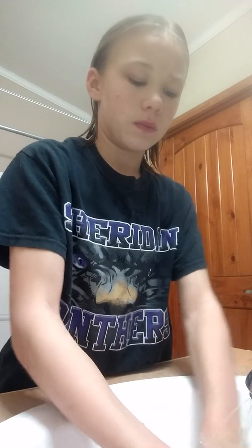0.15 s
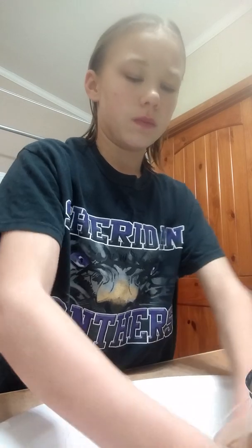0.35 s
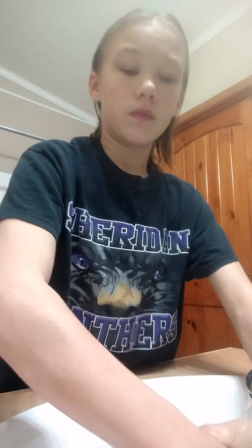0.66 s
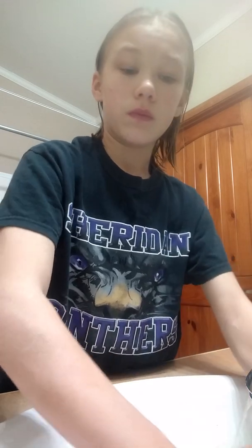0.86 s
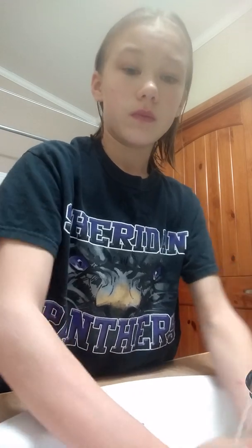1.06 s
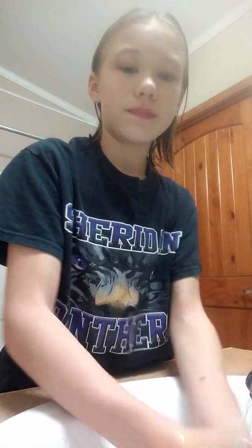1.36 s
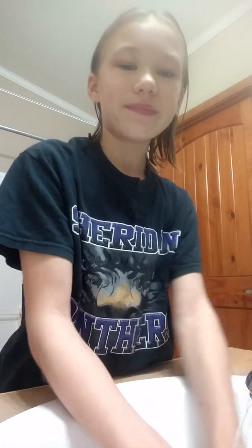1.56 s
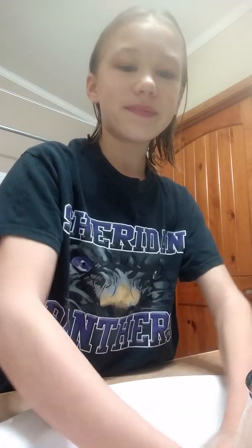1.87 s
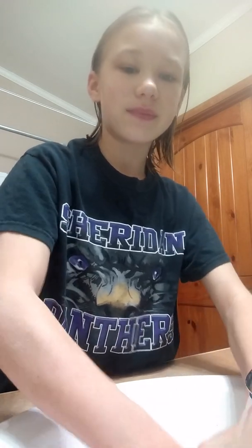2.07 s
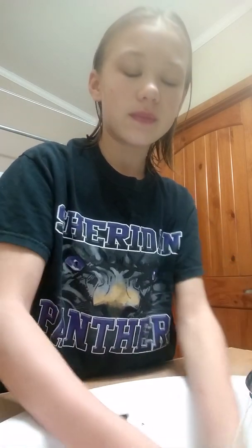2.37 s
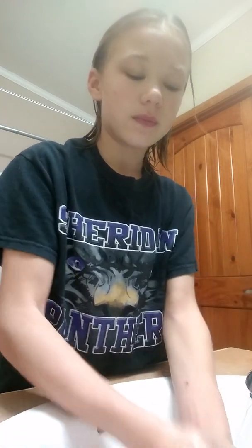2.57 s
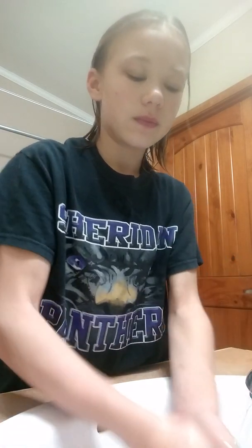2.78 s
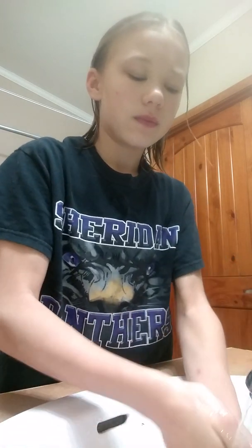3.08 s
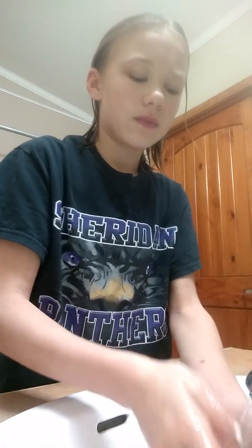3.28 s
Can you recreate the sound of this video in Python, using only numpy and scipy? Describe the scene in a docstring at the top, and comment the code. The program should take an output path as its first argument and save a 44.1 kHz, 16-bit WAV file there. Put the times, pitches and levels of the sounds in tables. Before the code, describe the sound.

Tap water rushes continuously into a ceramic basin in a small bathroom, broken by hands into spatters and occasional gurgles, with faint resonant ringing and low hum, heard close on a phone in stereo.

```python
"""In a small bathroom, a tap runs into a ceramic basin while hands are rinsed in the stream, close to a phone.
The churning water is noise that swells in drifting patches, with a fizz of tiny rising tones for bubbles.
Larger bubbles gurgle as gliding tones with a noisy wake; spits are short noisy bursts with a tick, high and low.
Basin, tap and room ring along as narrow resonances over a faint low hum.
The phone's two microphones hear the water with different colour and phase."""
import sys
import numpy as np
from scipy import signal
from scipy.fft import rfft, irfft, next_fast_len
from scipy.io import wavfile
from scipy.ndimage import uniform_filter1d

SR = 44100
rng = np.random.default_rng(int(sys.argv[2]) if len(sys.argv) > 2 else 0)


def log_audio(samples):
    """Write samples as a 16-bit WAV file to the path given in sys.argv[1]."""
    # one column per channel
    frames = np.atleast_2d(samples).T
    # limit to full scale, then quantise
    limited = np.clip(frames, -1, 1)
    pcm = np.round(limited * 32767).astype(np.int16)
    wavfile.write(sys.argv[1], SR, pcm)


N = 152145

# balance of the hiss between the microphones: pitch_hz [Hz], left_minus_right_db [dB]
BALANCE = [(30, 1.2), (50, 4.5), (70, 4.6), (100, 2.8), (150, 1.7), (300, -2.3), (450, -2.4), (650, -4.5),
           (900, -5.0), (1060, -2.9), (1250, -0.7), (1550, -2.5), (1800, -2.2), (2200, -1.7), (2500, -0.2),
           (2720, -2.0), (3100, -2.4), (3500, -0.5), (3900, -2.2), (4250, 2.0), (4500, -4.7), (4750, 0.0),
           (5050, -1.3), (5350, -6.7), (5650, -5.2), (6000, -1.8), (6500, 0.0), (6850, 0.7), (7500, 0.4),
           (8000, 1.0), (8350, 6.0), (8650, 9.0), (9300, 4.4), (9700, 0.6), (10600, 0.4), (11150, 1.7),
           (11600, 0.5), (11900, 0.0), (12350, 0.3), (12650, 1.5), (12950, -0.0), (13450, -1.4),
           (13900, 3.7), (14200, 0.2), (14450, -0.3), (14600, -1.5), (14800, -0.0), (15050, 2.1),
           (15300, 0.9), (15500, 1.1)]
# colour of the hiss at the BALANCE frequencies, ahead of swell and balance: level_db [dB per Hz]
HISS_COLOUR = [-93, -86, -66, -69, -62.5, -65, -65.5, -66, -62.5, -69, -64, -64, -71.5, -74.5, -76, -70.5,
               -76, -76, -74, -70, -75, -70.5, -69.5, -71.5, -71, -79, -75.5, -79, -75, -76, -74.5, -69,
               -76.5, -76, -79.5, -75, -84, -85, -77, -82, -87, -83, -80.5, -70, -77, -78, -91, -75, -85,
               -90]


def amp(db):
    """Turns decibels into a plain multiplier."""
    return 10 ** (np.asarray(db) / 20)


def evened(x):
    """Scales a signal to an average (RMS) strength of 1."""
    return x / np.sqrt(np.mean(x ** 2) + 1e-20)


def along(hz, values, table=BALANCE):
    """Reads values, listed at the table's frequencies, at the frequencies hz on a log scale."""
    table_hz = np.transpose(table)[0]
    return np.interp(np.log(hz + 1), np.log(table_hz + 1), values)


def flow_db(t):
    """Swell of the water's body and treble around their means, in dB at the times t."""
    # loudness of the flow: start_s [s], body_db [dB, below about 2 kHz], treble_db [dB]
    flow_points = [(0.0, -39.5, -40.5), (0.07, -40.5, -39.5), (0.1, -37.5, -39), (0.76, -38.5, -41),
                   (0.93, -36.5, -39), (1.37, -37.5, -39.5), (1.4, -36, -35.5), (1.52, -35, -39.5),
                   (1.66, -37, -38), (1.77, -34, -39), (1.8, -38.5, -38.5), (1.9, -36, -37),
                   (2.11, -39, -41), (2.14, -35.5, -36), (2.4, -37, -40), (2.77, -36.5, -36.5),
                   (2.84, -38.5, -39), (3.03, -34, -37), (3.13, -39.5, -36.5), (3.19, -37, -37.5),
                   (3.42, -40.5, -39), (3.45, -39.5, -32)]
    start_s, *levels = np.transpose(flow_points)
    return [np.interp(t, start_s, db) - np.mean(db) for db in levels]


def bubble(hz, cycles, rise):
    """A trapped air bubble sings a short dying tone that glides upward."""
    u = np.arange(0, 3, hz / cycles / SR)  # time, where 1 lasts the given number of starting cycles
    fade = np.minimum(u / 0.09, 1) * np.exp(-2.5 * u)
    return fade * np.sin(2 * np.pi * cycles * (u + rise * u ** 2 / 2))


def burst(hz, octaves, envelope):
    """Splashing water as noise around hz under an envelope, filtered from white noise of strength 1."""
    f = np.fft.rfftfreq(len(envelope), 1 / SR) + 1
    band = np.exp(-(np.log2(f / hz) / octaves) ** 2 / 2)
    noise = rfft(rng.standard_normal(len(envelope)))
    return envelope * irfft(noise * band, len(envelope))


def churn():
    """Turbulent water as three unrelated noise streams that share the flow, patches and flicker."""
    steady_below_hz, steady_above_hz = 840, 20000  # swells weaken gradually towards both ends
    patch_db, flicker_db = 2, 0.5  # before that weakening
    frames, hz = N // 64 + 5, np.fft.rfftfreq(256, 1 / SR)
    z = rng.standard_normal((frames, len(hz), 7)).T
    # patches are smooth over 6 frequency steps and 30 time steps
    patches = uniform_filter1d(z[6], size=6, axis=0)
    patches = evened(uniform_filter1d(patches, size=30, axis=1))
    flicker = evened(uniform_filter1d(rng.standard_normal(frames), size=16))

    body_db, treble_db = flow_db(np.arange(frames) * 64 / SR)
    high = np.clip(np.log2(hz / 1900 + 1e-9), 0, 1)[:, None]  # 0 in the body, 1 in the treble
    lively = hz / (hz + steady_below_hz) / (1 + (hz / steady_above_hz) ** 2)
    swell_db = (1.5 - high) * body_db + high * treble_db
    swell_db = swell_db + patch_db * patches + flicker_db * flicker
    level = amp(lively[:, None] * swell_db)

    # each white stream has strength 1 before it swells
    plain = signal.istft(z[0] + 1j * z[3], nperseg=256, noverlap=192)[1]
    white = (z[:3] + 1j * z[3:6]) / np.sqrt(np.mean(plain ** 2))
    return signal.istft(white * level, nperseg=256, noverlap=192)[1][:, :N]


def bubbles():
    """A dense random fizz of tiny bubbles: small ones sing high, large ones low."""
    per_s, spread_db, cycles = 900, 4, 9.8
    fizz_db = -12  # against white noise of strength 1, before the flow swells it
    happens = rng.random(N) < per_s / SR
    size = amp(spread_db * np.minimum(rng.exponential(1, N), 5)) * happens
    pitches = np.geomspace(491, 6850, num=30)  # Hz
    kind = rng.integers(0, len(pitches), N)
    fizz = np.zeros(N)
    for k, hz in enumerate(pitches):
        tone = bubble(hz, cycles, 0.22) * hz  # higher tones start stronger
        fizz += signal.oaconvolve(size * (kind == k), tone)[:N]
    body_db = flow_db(np.arange(N) / SR)[0]
    return amp(fizz_db + body_db) * evened(fizz)


def gurgles():
    """Larger bubbles sing a rising tone with a noisy wake; the later hiss colour is undone beforehand."""
    # larger bubbles: start_s [s], level_db [dB, rough peak before microphone balance], pitch_hz [Hz]
    gurgle_rows = [(1.1902, -27, 885), (1.388, -17, 1495), (1.445, -22, 1180), (1.5056, -21.5, 1390),
                   (1.52, -21.5, 1210), (1.572, -29, 835), (1.614, -21.5, 916), (1.74, -21, 900),
                   (1.681, -22, 888), (2.457, -22, 1464), (2.9935, -12, 1810), (3.006, -16, 1890),
                   (3.017, -21, 1410), (3.022, -20, 907), (3.031, -20, 1300), (3.2195, -20.5, 1530)]
    cycles, rise = 19, 0.072
    wake_db, wake_t60_s, wake_octaves = -8, 0.074, 0.51
    t, out = np.arange(8192) / SR, np.zeros(N + SR)
    wake = np.minimum(t / 0.0011, 1) * amp(wake_db - 60 * t / wake_t60_s)
    for start_s, level_db, hz in gurgle_rows:
        sound = burst(hz, wake_octaves, wake)
        tone = bubble(hz, cycles, rise)
        sound[:len(tone)] += tone
        gain = amp(level_db - along(hz, HISS_COLOUR)) / np.sqrt(SR / 2)
        out[round(start_s * SR):][:len(t)] += sound * gain
    return out[:N]


def spits():
    """Short noisy bursts with a tick and a brief tail, listed and random small ones, in two draws of noise."""
    # short noisy bursts: start_s [s], level_db [dB, before colour and balance], pitch_hz [Hz, centre]
    spit_rows = [(0.0885, 12, 4830), (0.1241, 11.5, 4600), (0.156, 6, 5600), (0.164, 14, 4460),
                 (0.2892, 9, 5300), (0.3237, 1, 5400), (0.392, 12, 5640), (0.4049, 13, 2660),
                 (0.4279, 10, 5600), (0.5761, 10.5, 5500), (0.6262, 10, 4930), (0.6893, 14.5, 5460),
                 (0.7234, 14, 4700), (0.7438, 15.5, 3130), (0.7597, 16, 4770), (0.8205, 8, 5500),
                 (0.8599, 12.5, 4860), (0.8932, 15, 4750), (0.9491, 9, 4780), (0.9999, 15, 5270),
                 (1.0449, 18.5, 5400), (1.0834, 11.5, 5230), (1.1398, 9, 5540), (1.1878, 13.5, 4570),
                 (1.2285, 18, 4440), (1.2713, 11, 4160), (1.3004, 6, 5400), (1.3504, 10, 4650),
                 (1.3801, 12.5, 4850), (1.4382, 9, 4720), (1.4708, 11, 5400), (1.5155, 5, 5500),
                 (1.547, 11, 5630), (1.5869, 10, 5230), (1.6187, 3, 5500), (1.6467, 10.5, 5700),
                 (1.6881, 11, 5400), (1.6965, 20.5, 4760), (1.7342, 18, 4800), (1.7865, 7, 2890),
                 (1.8168, 8, 5640), (1.8554, 17, 4400), (1.8561, 15, 2850), (1.8939, 10, 2930),
                 (1.9236, 8.5, 4320), (2.0208, 10, 5500), (2.0592, 14.5, 5500), (2.1385, -1, 5500),
                 (2.1667, 9, 4800), (2.2277, 17, 5700), (2.2737, 9, 5600), (2.3111, 4, 5600),
                 (2.3488, 12.5, 3180), (2.4538, 12, 5460), (2.4867, 15, 4940), (2.5266, 15.5, 4860),
                 (2.6014, 12.5, 5370), (2.6478, 1, 4800), (2.7059, 5, 3380), (2.7508, 8, 5400),
                 (2.7799, 15, 3630), (2.9008, 8, 5550), (2.9119, 11, 3300), (2.9707, 18.5, 5600),
                 (2.9945, 12.5, 3530), (3.0251, 12.5, 3240), (3.0317, 6, 4300), (3.042, 2, 5600),
                 (3.0724, 6, 5600), (3.1173, 9, 4400), (3.1971, 14, 4760), (3.2421, 15, 4830),
                 (3.2929, 8, 5500), (3.3288, 9, 5500), (3.3546, 11, 5200), (3.3974, 12, 5000)]
    small_per_s, small_db, small_hz = 50, 8, 5100
    rise_s, t60_s, octaves = 0.0019, 0.027, 0.19
    tail_db, tail_t60_s = -5, 0.052
    tick_db, tick_cycles = -1, 5.5
    rows = list(spit_rows)
    for a, b, c in rng.random((int(small_per_s * N / SR), 3)):
        # random start, a level mostly below small_db, and a pitch around small_hz
        rows.append((a * N / SR, small_db + 4 * np.log(b + .01), small_hz * (0.76 + 0.47 * c)))

    t, out = np.arange(4096) / SR, np.zeros((2, N + SR))
    fade = amp(-60 * t / t60_s) + amp(tail_db - 60 * t / tail_t60_s)
    shape = np.minimum(t / rise_s, 1) * fade
    widths = .5 + rng.random(len(rows))
    for (start_s, level_db, hz), wide in zip(rows, widths):
        # a wider band is turned down to keep its strength
        sound = np.array([burst(hz, wide * octaves, shape / np.sqrt(wide)) for _ in out])
        tick = bubble(hz, tick_cycles, 0.0012)
        sound[:, :len(tick)] += amp(tick_db) * tick  # the same tick in both draws
        out[:, round(start_s * SR):][:, :len(t)] += amp(level_db) * sound
    return out[:, :N]


def ringing(hz, shaking):
    """Basin, tap and room resonate at their own frequencies when the water shakes them."""
    # modes: pitch_hz [Hz], width_hz [Hz], left_db and right_db [dB per Hz, before trim], left_lead [rad]
    modes = [(67, 8, -53, -58, -2.2), (120, 9, -55, -57.5, -1.6), (147, 10, -56, -58.5, -1.5),
             (258, 10, -54, -58, -1.7), (511, 25, -67, -61.5, -.5), (678, 11, -65, -54, .8),
             (906, 75, -63.5, -57.5, 0), (1468, 26, -63, -60, -.7), (1536, 25, -63, -60.5, -1.4),
             (1619, 18, -62, -57.5, -1.5), (5665, 80, -62, -58.5, 2), (6211, 12, -61, -60.5, .1),
             (7048, 7, -56, -55, 0), (7275, 6, -56, -59, -2.4), (9050, 6, -54.5, -55.5, -.3),
             (10265, 32, -60, -58, 2.7), (13750, 26, -77, -71, 2.5)]
    trim_db = -.5
    left, right = 0, 0
    for mode_hz, width_hz, left_db, right_db, left_lead in modes:
        off = 2j * (hz - mode_hz) / width_hz
        # the second factor makes a mode fall off faster far from its pitch
        ring = amp(trim_db) * shaking / (1 + off) / (1 + off / 5.9)
        left = left + amp(left_db) * ring
        right = right + amp(right_db) * np.exp(-1j * left_lead) * ring
    return left, right


def hum():
    """A low tone whose level wavers slowly and alike in both microphones, with a fixed phase lead between them."""
    pitch_hz, level_db, waver_db, left_lead = 221.8, -44.5, 1.5, -1.1  # lead in rad
    t = np.arange(N) / SR
    slow = [np.sin(2 * np.pi * (f * t + rng.random())) for f in np.geomspace(.3, 3, num=12)]
    waver = evened(sum(slow))
    turn = 2 * np.pi * pitch_hz * t
    return np.sqrt(2) * amp(level_db + waver_db * waver) * np.sin([turn + left_lead, turn])


def causal(db):
    """Filter with the given gains whose response starts sharply and rings afterwards (minimum phase)."""
    log_gain = np.log(amp(np.concatenate([db, db[-2:0:-1]])))
    return np.exp(np.conj(signal.hilbert(log_gain))[:len(db)])


def scene():
    """The water reaches both microphones by a broad coloured path and by the ringing modes."""
    # likeness of the hiss in both microphones: pitch_hz [Hz], likeness [0-1], left_lead [rad]
    likeness_rows = [(50, 0.99, -2.2), (150, 0.99, -1.4), (300, 0.35, -1.8), (450, 0.82, -0.3),
                     (650, 0.67, 0.5), (900, 0.96, -0.1), (1060, 0.84, -1.4), (1250, 0.98, 0.1),
                     (1550, 0.87, -1.2), (1900, 0.84, -1.5), (2200, 0.71, -2.5), (2360, 0.995, 3.14),
                     (2590, 0.997, 3.14), (2650, 0.7, 2.8), (2950, 0.44, 3.0), (3200, 0.32, -0.3),
                     (3500, 0.93, -0.0), (3900, 0.74, 0.2), (4080, 0.5, -1.1), (4300, 0.82, 0.3),
                     (4500, 0.38, -2.7), (4750, 0.67, 2.4), (5050, 0.95, 3.0), (5350, 0.45, 1.7),
                     (5750, 0.76, 1.6), (6050, 0.29, 0.7), (6700, 0.83, 0.2), (7150, 0.32, 3.1),
                     (7500, 0.65, -3.0), (7720, 0.92, 3.1), (8120, 0.94, 3.1), (8450, 0.45, -1.0),
                     (9000, 0.83, -0.4), (9450, 0.64, -0.0), (9850, 0.66, 3.1), (10120, 0.97, 3.1),
                     (10650, 0.96, 3.1), (10850, 0.75, 2.9), (11150, 0.58, -1.1), (11600, 0.97, -0.0),
                     (12050, 0.93, -0.0), (12350, 0.61, -1.4), (12850, 0.96, 3.1), (13200, 0.6, 2.8),
                     (13550, 0.56, 0.1), (13800, 0.31, 2.8), (14200, 0.9, -0.7), (14600, 0.55, -2.6),
                     (14950, 0.53, -1.5), (15200, 0.87, 3.1)]
    spit_tilt_db, spit_ring_db = -2, -1.5  # left-minus-right tilt of the spits; their share in the ringing
    size = 2 * next_fast_len(N // 2 + SR // 2)
    hz = np.fft.rfftfreq(size, 1 / SR)

    main, other, shaking = churn()
    spray, scattered = spits()
    main = rfft(main + bubbles(), size)
    other = rfft(other + scattered, size)
    near = rfft(spray, size)
    slosh = rfft(gurgles(), size)
    shaking = rfft(shaking + amp(spit_ring_db) * spray, size)

    _, like, left_lead = np.transpose(likeness_rows)
    pair = along(hz, like * np.exp(-1j * left_lead), likeness_rows)
    unlike = np.sqrt(1 - np.minimum(abs(pair), 1) ** 2)
    colour = causal(along(hz, HISS_COLOUR))
    tilt = amp(along(hz, np.transpose(BALANCE)[1]) / 2)
    spit_tilt = amp(spit_tilt_db / 2)

    left = colour * tilt * (main + spit_tilt * near + slosh)
    # gurgles are not weakened by the likeness, only shifted in phase by it
    shared = pair * (main + near / spit_tilt + slosh / abs(pair + 1e-9))
    right = colour / tilt * (shared + unlike * other)
    ring_left, ring_right = ringing(hz, shaking)
    both = np.array([left + ring_left, right + ring_right])
    return np.sqrt(SR / 2) * irfft(both, size)[:, :N] + hum()


def record(dry):
    """The phone's bass roll-off below 61 Hz and its band limit at 15520 Hz."""
    bass_cut = signal.butter(8, 61, "high", fs=SR, output="sos")
    thin = signal.sosfilt(bass_cut, dry)
    band_limit = signal.firwin(511, 15520, window=("kaiser", 9), fs=SR)
    return signal.oaconvolve(thin, band_limit[None], "same")


dry = scene()
out = record(dry)
log_audio(out)
```